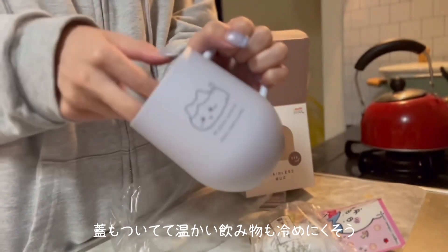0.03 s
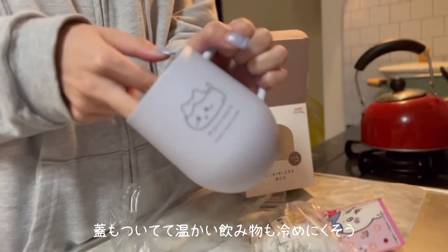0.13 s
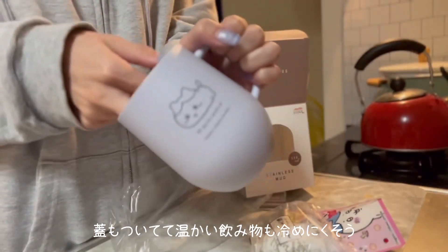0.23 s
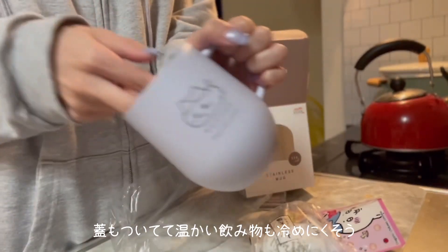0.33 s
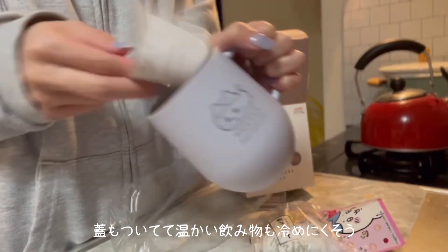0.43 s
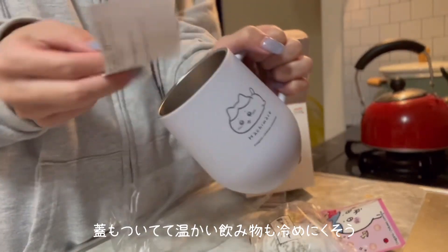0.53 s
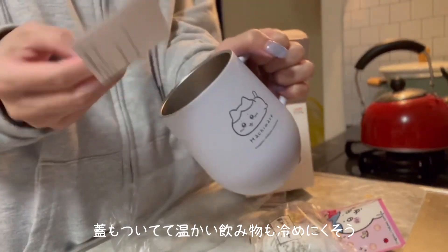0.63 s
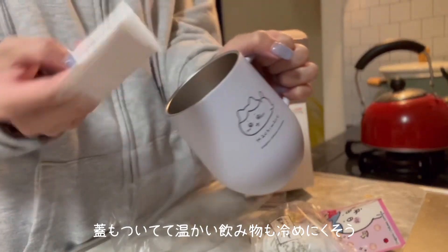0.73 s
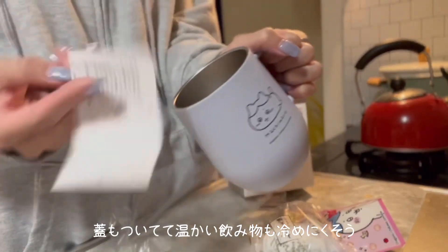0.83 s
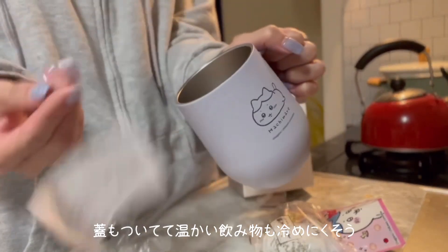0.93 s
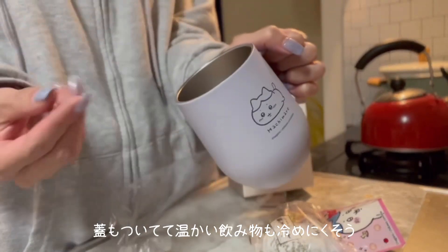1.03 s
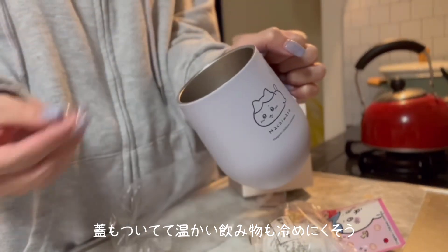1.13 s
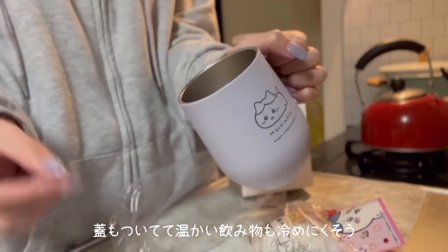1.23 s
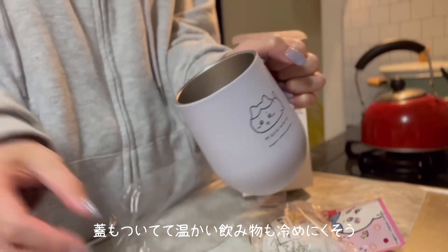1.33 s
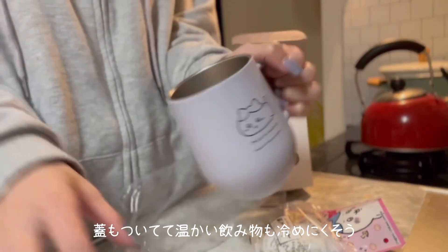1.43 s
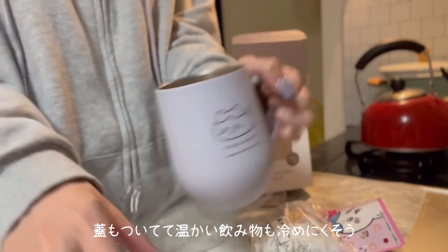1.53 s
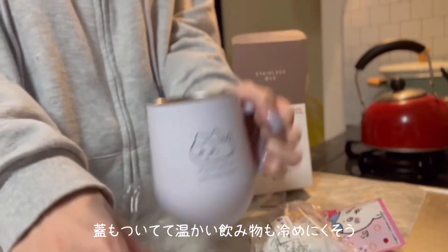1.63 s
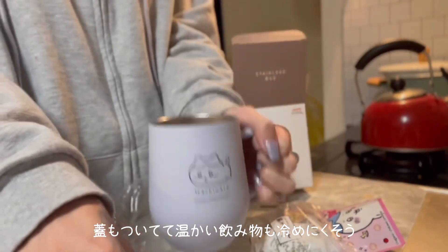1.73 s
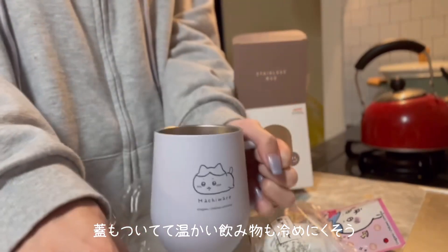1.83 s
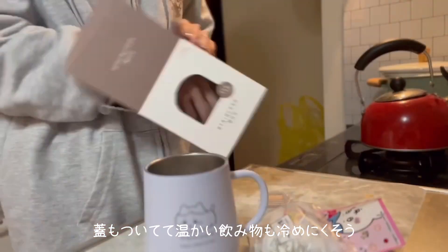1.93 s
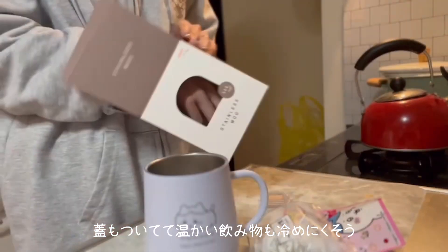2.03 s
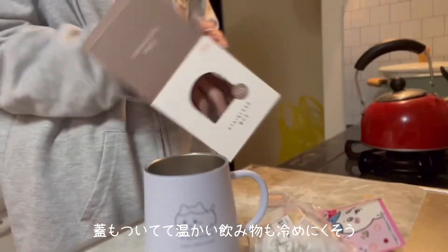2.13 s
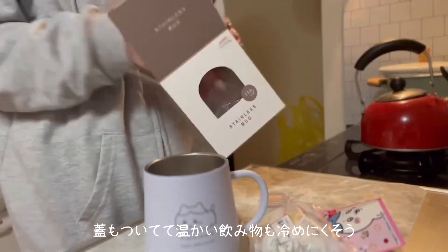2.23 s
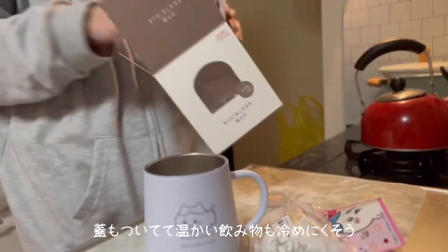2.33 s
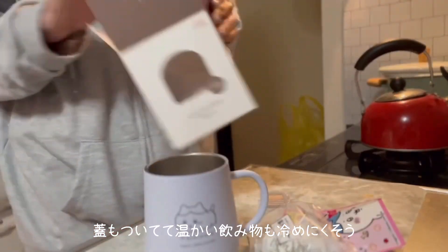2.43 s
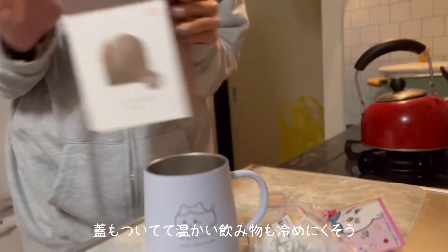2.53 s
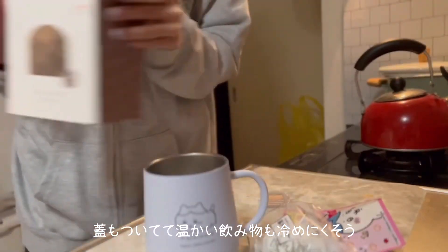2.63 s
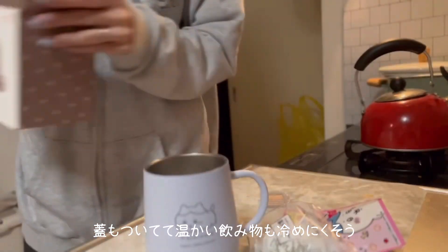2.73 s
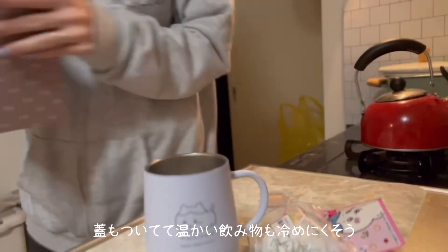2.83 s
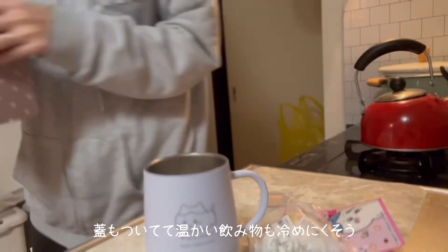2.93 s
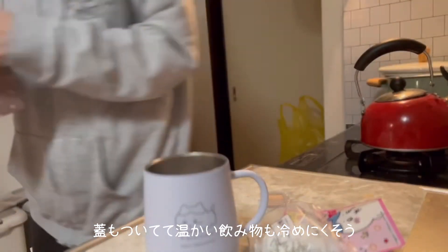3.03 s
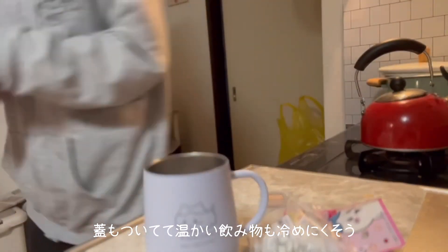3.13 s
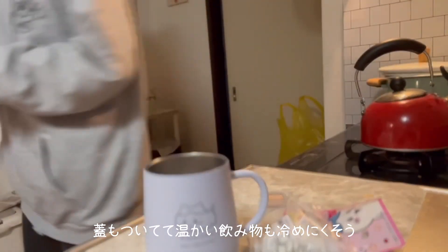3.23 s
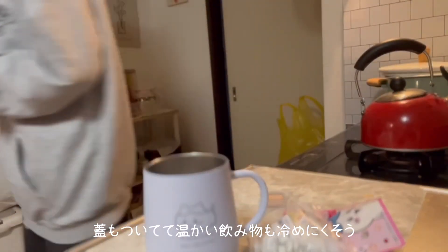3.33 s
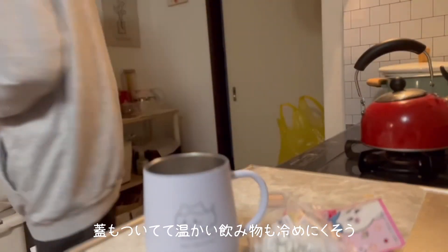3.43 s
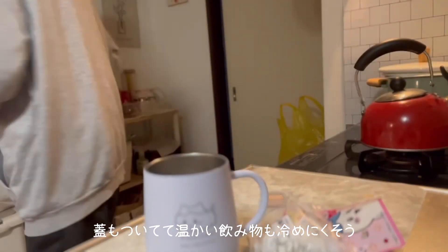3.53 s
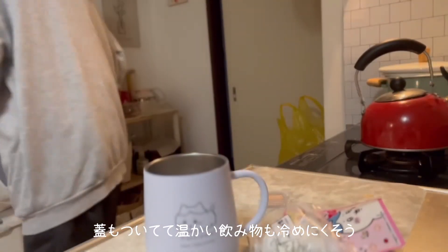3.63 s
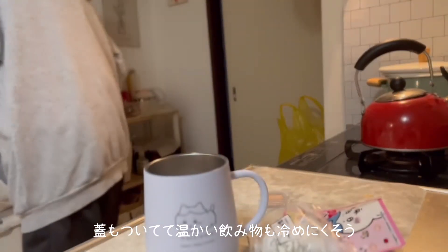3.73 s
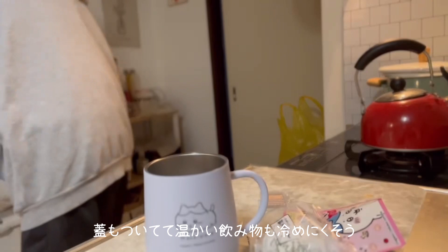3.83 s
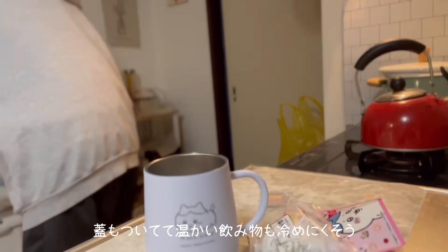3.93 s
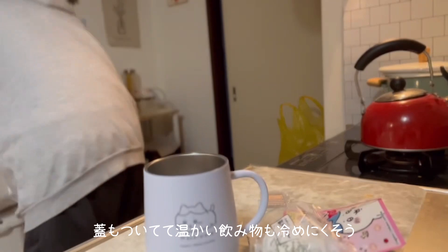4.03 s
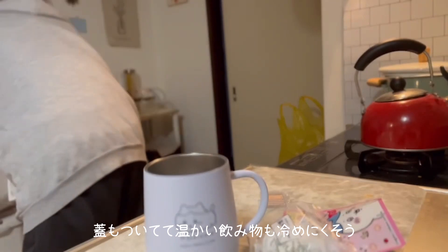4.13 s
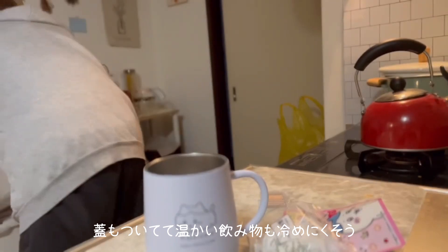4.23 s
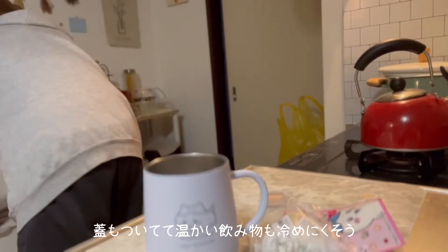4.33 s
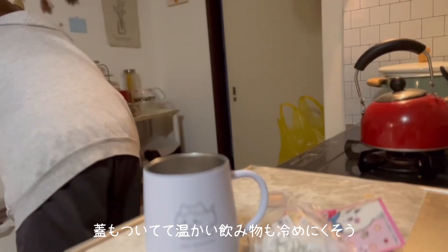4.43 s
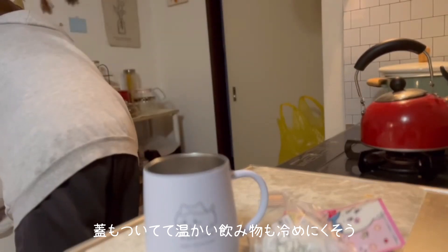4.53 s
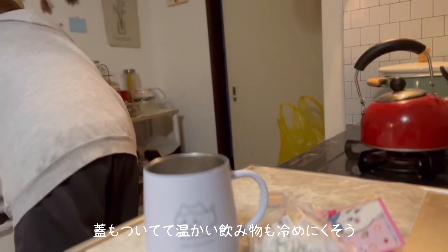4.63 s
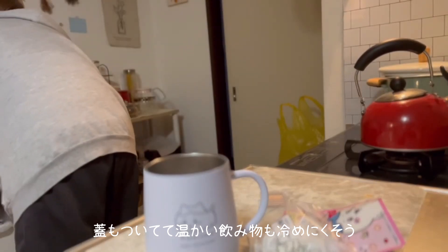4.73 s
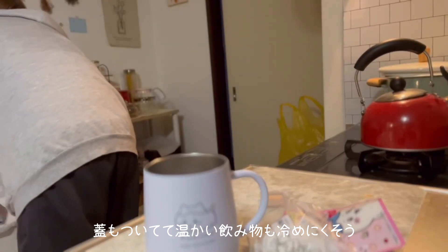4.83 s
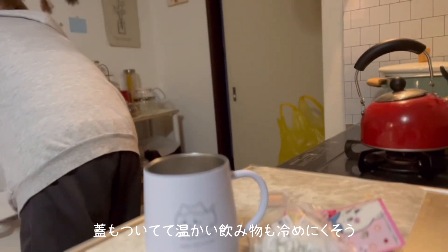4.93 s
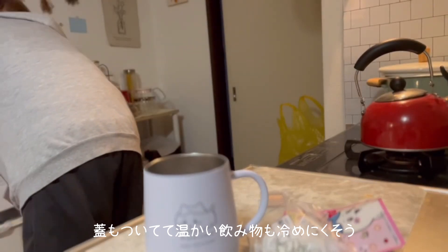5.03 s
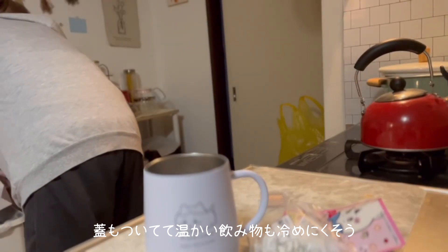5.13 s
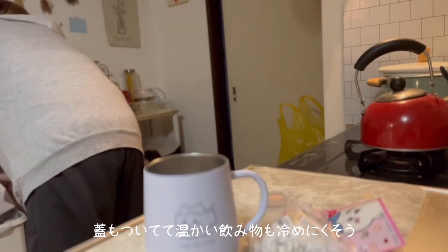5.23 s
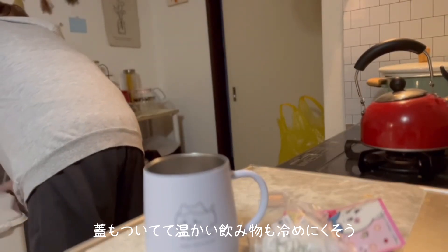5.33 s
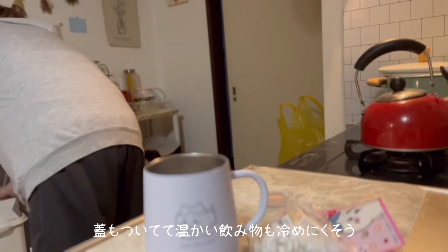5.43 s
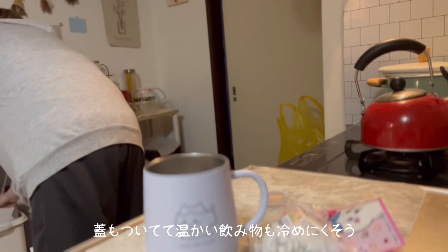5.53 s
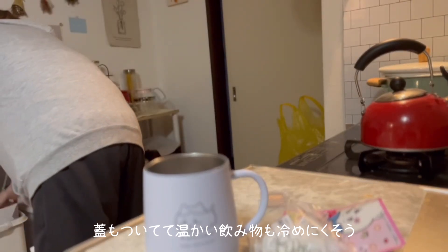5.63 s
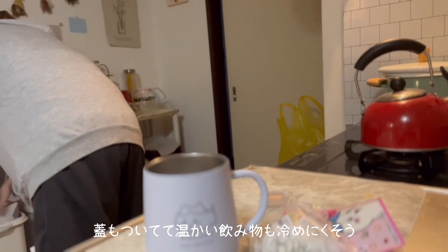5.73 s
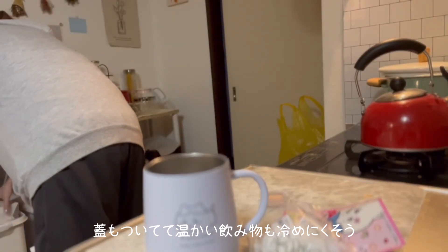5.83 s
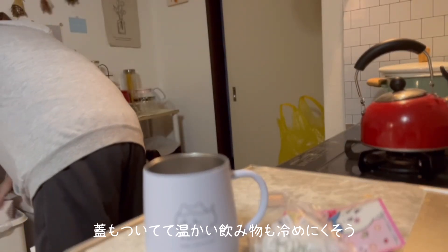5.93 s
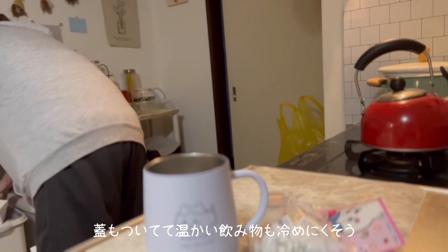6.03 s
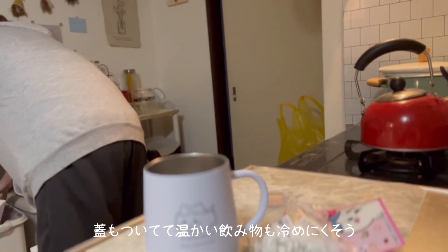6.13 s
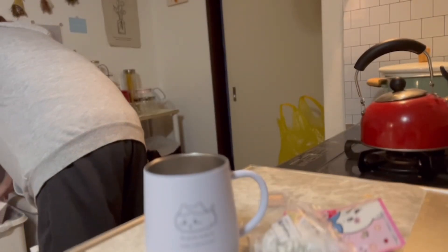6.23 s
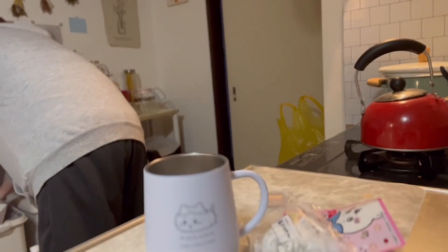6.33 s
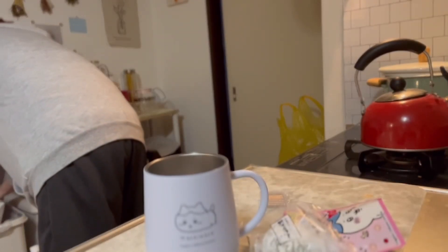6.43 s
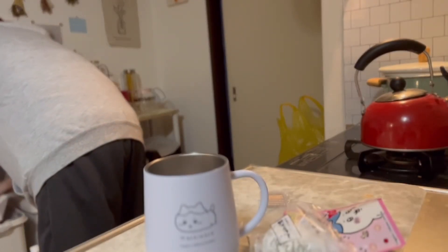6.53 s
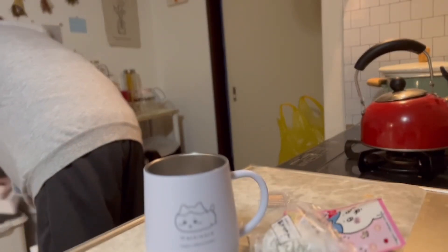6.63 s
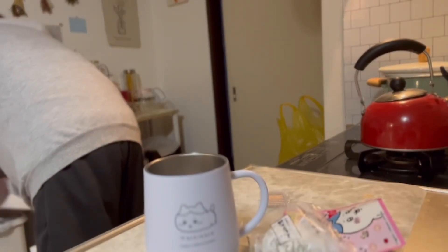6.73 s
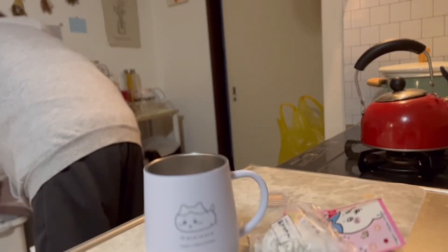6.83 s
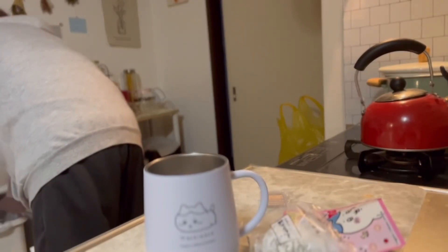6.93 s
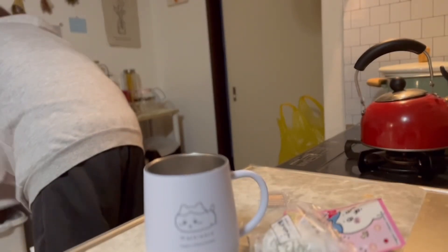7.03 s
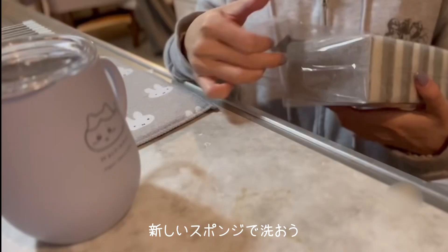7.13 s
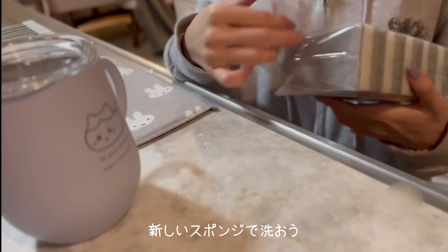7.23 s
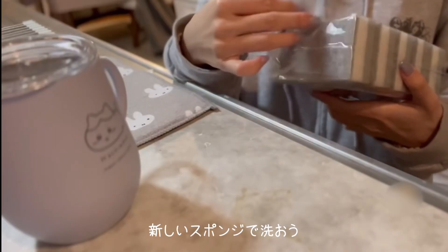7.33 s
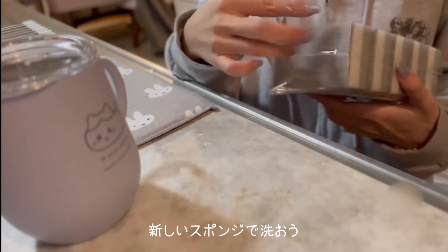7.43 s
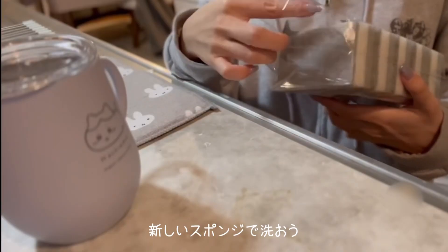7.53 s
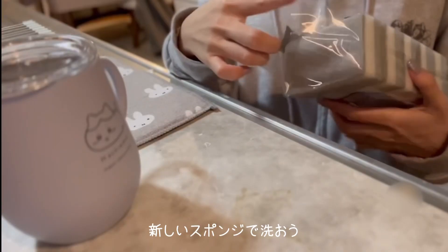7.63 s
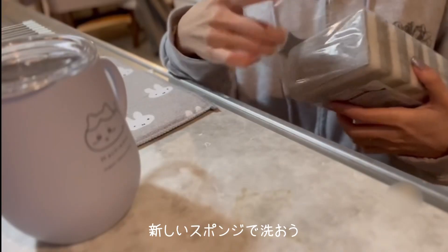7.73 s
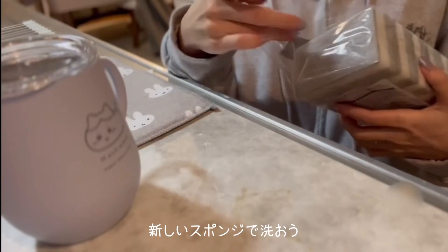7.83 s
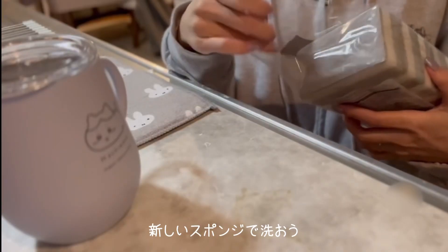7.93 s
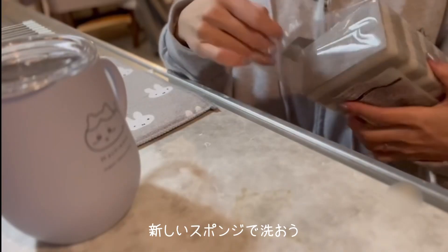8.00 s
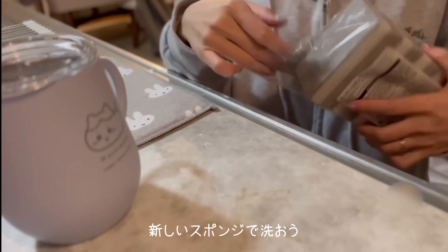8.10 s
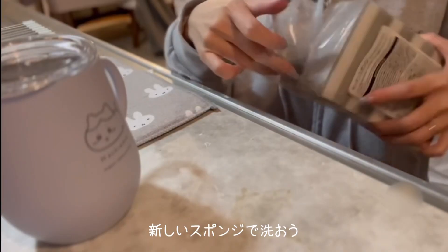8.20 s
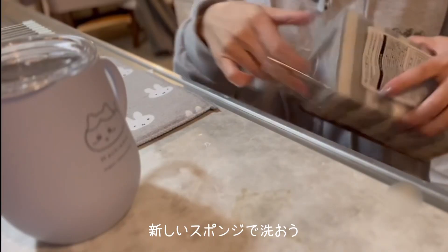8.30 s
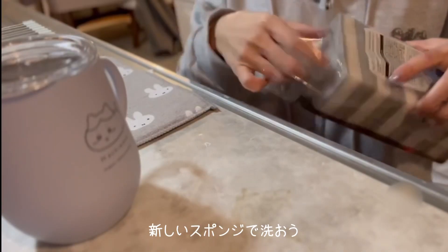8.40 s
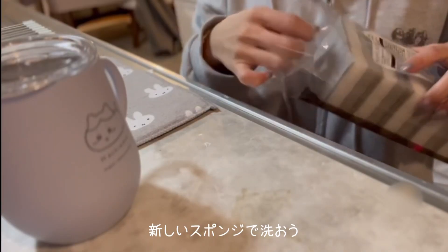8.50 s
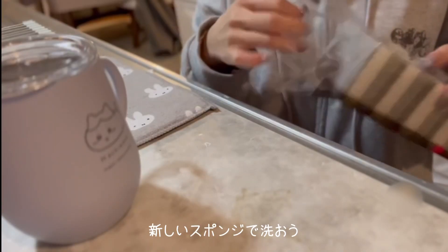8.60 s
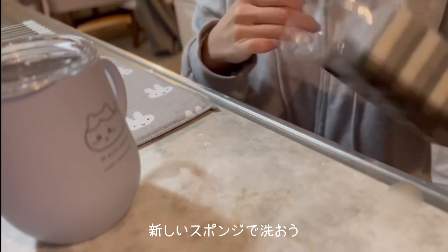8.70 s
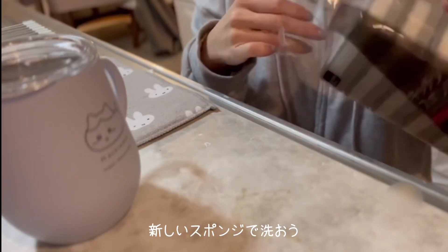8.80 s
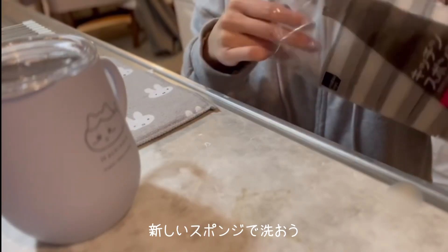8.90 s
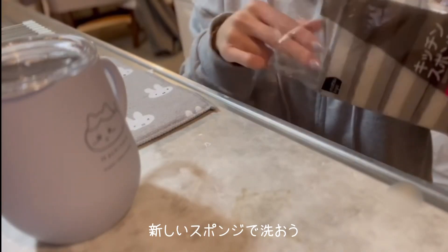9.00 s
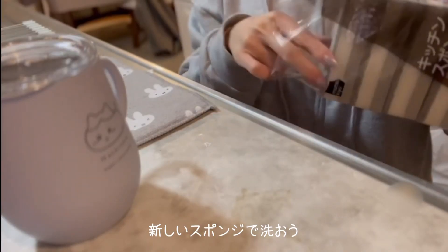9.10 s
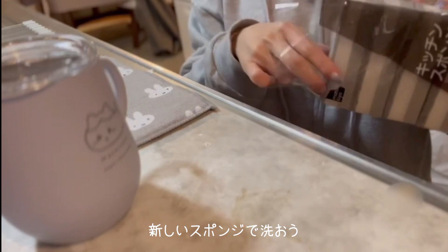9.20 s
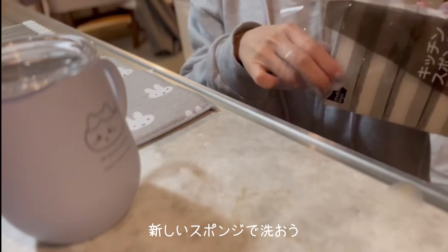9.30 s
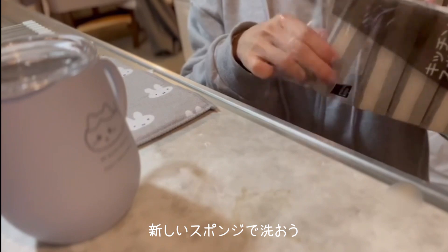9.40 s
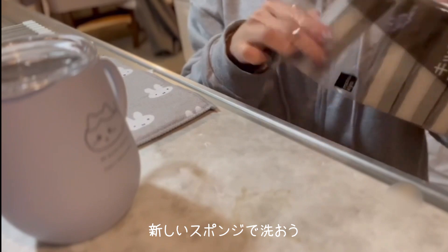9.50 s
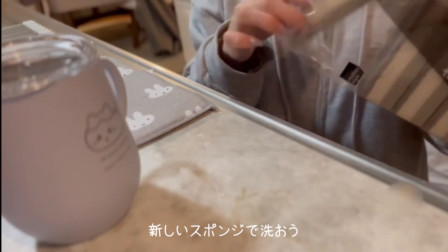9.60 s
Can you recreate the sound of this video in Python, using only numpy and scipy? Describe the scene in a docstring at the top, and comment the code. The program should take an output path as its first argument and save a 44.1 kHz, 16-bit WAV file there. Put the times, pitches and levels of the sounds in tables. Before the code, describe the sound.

In a small kitchen with a faint low hum, a cardboard insert squeaks and scrapes from a steel mug, then clacks sharply on the counter. The mug is set down with small clicks, a hollow box pops and rubs. Sweatshirt swishes, soft steps and muffled cupboard bumps follow at left. Finally a plastic sponge pack crinkles brightly, close to the stereo microphones.

```python
"""Cardboard squeaks and scrapes out of a singing steel mug by stick-slip, over a low hum, and clacks down.
Blows ring the modes of a kitchen counter and a hollow box; fingers brush cardboard as random friction.
A sweatshirt swishes, soft steps thud, and things scuff and bump in a low cupboard off to the left.
Then a plastic pack of sponges crinkles close by as its film buckles in many short, ringing creases.
Decaying noise gives the small kitchen's reflections; phase curves give two closely spaced microphones."""
import sys
import numpy as np
from scipy import signal
from scipy.fft import rfft, irfft, next_fast_len
from scipy.io import wavfile
from scipy.ndimage import uniform_filter1d

SR = 44100
rng = np.random.default_rng(int(sys.argv[2]) if len(sys.argv) > 2 else 0)


def output_pcm(signal):
    """Save a mono or channel-first signal as 16-bit PCM at the path in sys.argv[1].

    Samples are clipped to [-1, 1] before scaling.
    """
    pcm = np.clip(np.atleast_2d(signal).T, -1, 1) * 32767
    wavfile.write(sys.argv[1], SR, np.round(pcm).astype(np.int16))


N = 426006  # samples


def undb(db):
    """Decibel law: level to amplitude ratio."""
    return 10 ** (np.asarray(db) / 20)


def unit(x):
    """Normalisation to an RMS of one."""
    return x / np.sqrt(np.mean(x ** 2))


def seconds(count):
    """Sampling: the time of each sample."""
    return np.arange(count) / SR


def add(track, start_s, sound):
    """Superposition: mix a sound in at its start time."""
    i = int(start_s * SR)
    track[i:i + len(sound)] += sound[:N - i]


def peak(x, level_db):
    """Short-time level: scale so that the loudest millisecond has the given RMS."""
    power = uniform_filter1d(x ** 2, size=44)
    return x * undb(level_db) / np.sqrt(power.max())


def colour(x, points, size=4096):
    """Minimum-phase filtering: a causal filter through (pitch_hz, level_db) points."""
    hz, db = np.transpose(points)
    bin_hz = np.arange(size // 2 + 1) * SR / size
    gain = undb(np.interp(np.log(bin_hz + 1), np.log(hz), db))
    # folding the cepstrum onto positive times makes the response causal
    cepstrum = irfft(np.log(gain))[:size // 2]
    cepstrum[1:] *= 2
    response = irfft(np.exp(rfft(cepstrum, size)))
    return signal.oaconvolve(x, response)[:len(x)]


def resonate(x, hz, q):
    """Resonance: a second-order band-pass of quality factor q."""
    hz = min(hz, SR / 3)
    w = 2 * np.pi * hz / SR
    a = np.sin(w) / (2 * q)
    return signal.lfilter([a, 0, -a], [1 + a, -2 * np.cos(w), 1 - a], x)


def ring(modes, count=36000):
    """Modal superposition: decaying sines, alternating in sign, form an impulse response."""
    t = seconds(count)
    out = np.zeros(count)
    for k, (hz, db, t60_s) in enumerate(modes):
        out += (-1) ** k * undb(db - 60 * t / t60_s) * np.sin(2 * np.pi * hz * t)
    return out


def strike(modes, contact_ms):
    """Impact excitation: a softer contact pushes for longer and misses the high modes."""
    t = seconds(count=2000) * 1000 / contact_ms
    push = t * np.exp(-2 * np.pi * t)
    return signal.fftconvolve(ring(modes, count=18000), push)


def burst(decay_ms, count=12000):
    """Random micro-impacts: a cluster that builds up quickly and decays exponentially."""
    t = seconds(count) * 1000 / decay_ms
    return rng.standard_normal(count) * np.exp(-t) * (1 - np.exp(-10 * t))


def walk(rate_hz, count=N):
    """Slow modulation: straight lines between random knots, with a spread near 1."""
    k = int(SR / rate_hz)
    knots = 1.2 * rng.standard_normal(count // k + 2)
    return (knots[:-1, None] + np.diff(knots)[:, None] * np.arange(k) / k).ravel()[:count]


def friction(rate_hz, spread_db, flicker_db):
    """Dry friction: a random train of slips of uneven size that come in flurries."""
    flurry = walk(45)
    at = np.flatnonzero(rng.random(N) < rate_hz / SR)
    sign, size = rng.random((len(at), 2)).T
    size_db = spread_db * np.minimum(-np.log(1 - size), 4)
    slips = np.zeros(N)
    slips[at] = np.sign(sign - .5) * undb(size_db + flicker_db * flurry[at])
    return slips


def strokes(rows, attack_s, release_s, axis=2):
    """Addition of powers: each movement builds up, then dies away after its length; axis picks the level."""
    power = np.zeros(N)
    for row in rows:
        start_s, length_s = row[:2]
        t = seconds(count=int((length_s + 10 * release_s) * SR))
        shape = np.minimum(t / attack_s, 1) * np.exp(-np.maximum(t - length_s, 0) / release_s)
        add(power, start_s, (undb(row[axis]) * shape) ** 2)
    return np.sqrt(power)


def swell(count):
    """Half-sine envelope: the smooth rise and fall of one short movement."""
    return np.sin(np.pi * np.arange(count) / count)


def rise_and_fall(rise_ms, count):
    """Critically damped pulse: an envelope that peaks after its rise time and then fades."""
    t = seconds(count) * 1000 / rise_ms
    return t * np.exp(1 - t)


def shifting(x, depth_db=3.5, rate_hz=11):
    """Changing contact: as the touching surfaces change, each frequency band swells and sinks on its own."""
    out = 0
    for hz in 400 * 2 ** np.arange(5):
        low = signal.filtfilt(*signal.butter(2, hz, fs=SR), x)
        out = out + low * undb(depth_db * walk(rate_hz))
        x = x - low
    return unit(out + x * undb(depth_db * walk(rate_hz)))


def bumps(rows, q):
    """Damped collision: soft, ragged bursts, each filtered around its own pitch."""
    out = np.zeros(N)
    for start_s, level_db, hz, decay_ms in rows:
        bump = resonate(resonate(burst(decay_ms), hz, q), hz, q)
        add(out, start_s, peak(bump, level_db))
    return out


# kitchen background spectrum: pitch_hz, level_db
FLOOR = [(15, -38.5), (25, -6.5), (87, -1), (125, -7), (200, -9), (394, -19.5), (560, -29.5), (818, -26.5),
         (1200, -27), (1840, -34.5), (6560, -44), (7710, -48), (11000, -42), (14000, -35.5), (16000, -52)]
FLOOR_DB, HUM_HZ, HUM_DB = -59, 82.2, -64


def background(side_db=-5, side_hz=250):
    """Frequency modulation and shaped noise: a wavering appliance hum over room noise with shared bass."""
    mid, side = (unit(colour(rng.standard_normal(N), FLOOR)) for _ in range(2))
    treble = signal.lfilter(*signal.butter(1, side_hz, "high", fs=SR), side)
    side = undb(side_db) * (side / 2 + treble)
    hum_hz = HUM_HZ + 2.73 * walk(20)
    hum = np.sin(2 * np.pi * np.cumsum(hum_hz) / SR) * undb(1.4 * walk(3.9))
    return undb(FLOOR_DB) * (mid + np.array([side, -side])) + undb(HUM_DB) * unit(hum)


SQUEAK_GLIDE_PER_S = 0.63  # share by which the pitch rises as the grip tightens


def squeak(hz, count):
    """Stick-slip oscillation: a rough tone that catches and lets go, gliding with the grip."""
    glide = SQUEAK_GLIDE_PER_S * (seconds(count) - count / SR / 2)
    pitch = hz * (1 + glide + .012 * walk(60, count))
    roughness = 1 + .7 * walk(250, count)
    return np.sin(2 * np.pi * np.cumsum(pitch) / SR) * roughness * swell(count)


# two outer pulls and one between draw the cardboard over the rim: start_s, length_s, level_db (of slips)
PULLS = [(0, .032, -33.5), (.11, 0.097, -56.5), (.21, .18, -44)]
PULL_ATTACK_S, PULL_RELEASE_S = 0.093, 0.042
# spectrum of the slide: pitch_hz, level_db
SLIDE_COLOUR = [(150, -22), (450, -23), (680, -11), (1100, -6), (2200, 0.5), (3500, 4.5), (6000, 10.5),
                (8500, 6), (10500, 5), (13000, 7.5), (16000, 7)]
# modes of the steel mug: pitch_hz, level_db, t60_s
MUG_MODES = [(1495, 1, 0.8), (2260, -8, .4), (2695, -1, 0.35), (3219, -6, .2), (3967, 0, .45),
             (4856, -5, .2), (5017, -1, .45), (5120, -9, .6), (5222, 2, 0.6), (5280, -3, .45),
             (5900, -7, .4), (7601, -9, .6), (8300, -2, .25)]
# squeaks of cardboard on steel: start_s, length_s, pitch_hz, level_db
SQUEAKS = [(0.023, 0.15, 690, -53), (0.036, 0.071, 2670, -46), (.045, 0.069, 2153, -44),
           (0.053, 0.043, 3800, -42.5), (0.059, 0.031, 3380, -43), (0.103, 0.032, 2130, -53),
           (0.216, 0.039, 2190, -53.5), (0.218, 0.14, 686, -61.5), (0.284, 0.059, 2243, -51.5),
           (0.362, 0.03, 2190, -50), (.355, 0.037, 3800, -51), (0.359, 0.059, 5900, -44),
           (0.353, 0.11, 8210, -40.5), (.275, 0.083, 6580, -49), (.315, .04, 3900, -56),
           (.395, 0.028, 6730, -45)]


def sliding(slide_db=-2.5, steel_db=-13):
    """Friction-driven resonance: cardboard slips over the rim, keeps the steel singing and squeaks."""
    speed = strokes(PULLS, PULL_ATTACK_S, PULL_RELEASE_S)
    slips = unit(friction(rate_hz=2200, spread_db=2.0, flicker_db=3.5)) * speed
    steel = ring(MUG_MODES)
    singing = signal.oaconvolve(slips, steel / np.linalg.norm(steel))[:N]
    out = undb(slide_db) * colour(slips, SLIDE_COLOUR) + undb(steel_db) * singing
    for start_s, length_s, hz, level_db in SQUEAKS:
        add(out, start_s, undb(level_db) * squeak(hz, count=int(length_s * SR)))
    return out


# the insert catches the rim; where it does decides which modes sing most: start_s, level_db, pitch_hz
RIM_CATCHES = [(.005, -52, 1550), (.072, -43, 2900), (.118, -48, 3700), (.262, -53, 1500),
               (.315, -50, 2260), (.377, -48, 5500), (.428, -39.5, 5400)]


def mug():
    """Modal excitation: each catch on the rim sets the steel ringing, favouring nearby modes."""
    out, steel = np.zeros(N), ring(MUG_MODES)
    for start_s, level_db, hz in RIM_CATCHES:
        add(out, start_s, peak(resonate(steel, hz, 1.9), level_db))
    return out


# hard edges and fingernails: start_s, level_db, decay_ms
TICKS = [(0.077, -39, 3), (.118, -41, 5.8), (0.238, -43, 1.8), (0.378, -38, 6.2), (0.425, -35, 16),
         (.617, -54, 6.7), (1.0042, -12, 2.2), (1.0752, -32, 1), (1.093, -37, 3.8), (1.2008, -31.5, 4.4),
         (1.6653, -48.5, 11.3), (1.8382, -35, 3.7), (1.8605, -23.5, 3), (1.8868, -25.5, 7.5),
         (2.0914, -34, 5.7), (2.12, -51, 2.7), (2.148, -36, 1.7), (4.3307, -41.5, 4.5), (4.634, -43, 6.6),
         (5.346, -32.5, 5.6), (5.8254, -54, 2.9), (6.259, -51, 2.3), (6.423, -45.5, 8.7)]
# spectrum of a tick: pitch_hz, level_db
TICK_COLOUR = [(150, -7), (700, -11), (1800, -6.5), (3200, 0.5), (4800, -5), (6400, 3.5), (8000, 3.5),
               (11000, 3), (13500, 1.5), (16000, 1)]
# modes of the insert's hard edge as it lands: pitch_hz, level_db, t60_s
INSERT_MODES = [(1640, -12.5, .03), (2580, -11, .035), (3180, -7.5, 0.079), (5560, -5.5, .018),
                (6510, 4, .02), (7850, 4, .018)]
LANDING_S, LANDING_DB = 1.0048, -19


def ticks():
    """Impulsive contact: hard edges and fingernails tick; the insert lands with a ringing clack."""
    out = np.zeros(N)
    add(out, LANDING_S, peak(ring(INSERT_MODES), LANDING_DB))
    for start_s, level_db, decay_ms in TICKS:
        add(out, start_s, peak(colour(burst(decay_ms), TICK_COLOUR), level_db))
    return out


# modes of the counter top: pitch_hz, level_db, t60_s
COUNTER_MODES = [(63.5, -2.5, 0.68), (87, -12, 0.61), (122, -11, .2), (163, -1.5, 0.32), (218, -6, 0.12),
                 (285, -8, 0.095), (351, -1.5, .13), (465.5, -2, 0.08), (602, -1.5, 0.053), (805, 1, 0.036),
                 (1650, -13, .07), (2540, -14.5, 0.089)]
# blows on the counter: start_s, level_db, contact_ms, crack_db (relative to the blow)
COUNTER_BLOWS = [(1.0158, -25, 0.36, -11), (1.025, -23.5, 1.2, -18.5), (1.094, -35.5, 5.1, -10),
                 (1.862, -38, 0.64, -8), (1.888, -39.5, 1.8, 1)]
# modes of the hollow cardboard box: pitch_hz, level_db, t60_s
BOX_MODES = [(212, -13, 0.027), (534, -9, 0.052), (610, -3, 0.021), (730, 0, 0.014), (844, -9.5, 0.037),
             (972, -11.5, 0.029), (1500, -9, 0.031), (1820, -3, 0.0094)]
# knocks on cardboard: start_s, level_db, contact_ms, crack_db (relative to the knock)
BOX_KNOCKS = [(0.44, -51.5, 0.15, 13.5), (0.7431, -50, 0.22, 14), (2.0653, -18.5, 1, -19.5),
              (2.0805, -31, 0.94, -8.5), (2.4726, -39.5, 0.18, 3.5), (2.4934, -32.5, 0.078, 10),
              (2.5332, -36, 0.17, 2)]
# spectrum of the papery crack: pitch_hz, level_db
CRACK_COLOUR = [(100, 0), (300, 1), (1800, -4), (3300, -4.5), (6000, -5.5), (9000, -14), (16000, -31)]


def knocks():
    """Struck modes: the counter thuds; the box gives a hollow pop with a papery crack."""
    out = np.zeros(N)
    for start_s, level_db, contact_ms, crack_db in COUNTER_BLOWS:
        add(out, start_s, peak(strike(COUNTER_MODES, contact_ms), level_db))
        crack = resonate(burst(decay_ms=10.0), 1100, 0.71)
        add(out, start_s, peak(crack, level_db + crack_db))
    for start_s, level_db, contact_ms, crack_db in BOX_KNOCKS:
        add(out, start_s, peak(strike(BOX_MODES, contact_ms), level_db))
        crack = colour(burst(decay_ms=3.56), CRACK_COLOUR)
        add(out, start_s, peak(crack, level_db + crack_db))
    return out


# fingers brush over cardboard: start_s, length_s, level_db (before brush_db)
BRUSHES = [(.45, 0.41, -66.5), (1.1, 0.1, -57), (1.65, 0.52, -63.5), (1.92, 0.033, -43), (2.07, 0.075, -49),
           (2.16, 0.09, -56)]
BRUSH_ATTACK_S, BRUSH_RELEASE_S = 0.022, 0.035
# spectrum of brushing fingers and of swishing cloth: pitch_hz, level_db
SWISH_COLOUR = [(300, 4), (650, 7), (1100, -0.5), (1800, 4.5), (3000, 1), (6000, 1), (8500, 4),
                (10500, -11.5), (12800, 3), (16000, -5)]


def brushing(brush_db=1):
    """Random friction: fingertips slip over cardboard."""
    speed = strokes(BRUSHES, BRUSH_ATTACK_S, BRUSH_RELEASE_S)
    slips = friction(rate_hz=6000, spread_db=8.5, flicker_db=0.0)
    return unit(colour(slips, SWISH_COLOUR)) * speed * undb(brush_db)


# the box rubs along a sleeve: start_s, length_s, level_db (before the swell), pitch_hz
RUBS = [(2.699, 0.15, -63.5, 2010), (2.817, 0.17, -63, 1970), (2.897, .1, -66, 4130),
        (2.997, 0.17, -83, 1800)]


def rubbing():
    """Band-limited friction: cloth on cardboard rasps narrowly, its pitch differing from stroke to stroke."""
    out = np.zeros(N)
    for start_s, length_s, level_db, hz in RUBS:
        count = int(length_s * SR)
        slips = rng.standard_normal(count) * undb(3 * walk(60, count))
        rasp = unit(resonate(resonate(slips, hz, 2.4), hz, 2.5))
        add(out, start_s, undb(level_db) * rasp * swell(count))
    return out


# each movement of the body swishes the sweatshirt: start_s, length_s, level_db
SWISHES = [(2.71, 0.11, -60), (2.88, 0.13, -55.5), (3.05, 0.15, -65), (3.26, 0.17, -69.5), (3.47, 0.1, -61),
           (3.61, 0.12, -71), (4.24, 0.14, -60), (4.46, 0.14, -60.5), (4.625, 0.01, -45.5),
           (4.7, 0.37, -65), (5.18, 0.11, -58.5), (5.25, 0.11, -52), (5.335, 0.036, -44),
           (5.47, 0.065, -49), (5.66, 0.15, -63), (5.81, 0.17, -55.5), (6.0, 0.056, -51),
           (6.15, 0.11, -64.5), (6.31, 0.056, -54.5), (6.42, 0.071, -57), (6.76, 0.4, -59)]
SWISH_ATTACK_S, SWISH_RELEASE_S = 0.013, 0.044


def sweatshirt():
    """Dense friction: fine slips of cloth on cloth."""
    speed = strokes(SWISHES, SWISH_ATTACK_S, SWISH_RELEASE_S)
    slips = friction(rate_hz=9000, spread_db=6.5, flicker_db=1.5)
    return shifting(colour(slips, SWISH_COLOUR)) * speed


# cardboard and packets are dragged along a shelf: start_s, length_s, level_db
DRAGS = [(2.825, 0.032, -57.5), (2.87, 0.1, -61.5), (3.02, 0.063, -59.5), (3.095, 0.02, -58.5),
         (3.15, 0.19, -70), (6.725, 0.2, -55), (6.91, 0.14, -50.5), (7.03, 0.092, -48.5)]
DRAG_ATTACK_S, DRAG_RELEASE_S = 0.011, 0.0046
# spectrum of dragging: pitch_hz, level_db
DRAG_COLOUR = [(200, 6.5), (540, 2), (660, 11.5), (800, 0), (1000, -4), (1700, 4), (2300, -4.5),
               (3200, -8.5), (7000, -15), (15000, -38)]


def dragging():
    """Frictional chatter: a flat surface slips over a shelf."""
    speed = strokes(DRAGS, DRAG_ATTACK_S, DRAG_RELEASE_S)
    slips = friction(rate_hz=3600, spread_db=1.0, flicker_db=1.5)
    return shifting(colour(slips, DRAG_COLOUR)) * speed


# soft steps on the floor: start_s, level_db, pitch_hz, rise_ms
STEPS = [(3.1, -52, 92, 29), (3.236, -48, 79.7, 31), (3.315, -53, 84, 23), (4.394, -41.5, 113, 15)]


def steps():
    """Damped low oscillation: the floor gives a soft thud under each step."""
    out, t = np.zeros(N), seconds(count=12000)
    for start_s, level_db, hz, rise_ms in STEPS:
        thud = np.sin(2 * np.pi * hz * t) * rise_and_fall(rise_ms, count=len(t))
        add(out, start_s, undb(level_db) * thud)
    return out


# things are pushed about in the cupboard: start_s, length_s, level_db (before scuff_db)
SCUFFS = [(4.0, 0.42, -65), (4.48, 0.29, -55), (4.69, 0.11, -57.5), (4.8, 0.18, -65), (5.34, 0.064, -38),
          (5.49, 0.09, -50), (5.64, 0.078, -64.5), (5.89, 0.24, -65.5), (6.33, 0.21, -63),
          (6.55, 0.22, -66), (6.75, .29, -61.5), (7.068, .05, -43.5)]
SCUFF_ATTACK_S, SCUFF_RELEASE_S = 0.014, 0.016
# spectrum of scuffing: pitch_hz, level_db
SCUFF_COLOUR = [(60, 2), (125, 1.5), (185, 14), (260, 4.5), (370, 8.5), (480, -1), (650, -4), (1000, -5),
                (1800, -11), (3500, -39), (9000, -48)]
# things shifted in the cupboard: start_s, level_db, pitch_hz, decay_ms
CUPBOARD_BUMPS = [(3.567, -61.5, 678, 8.2), (3.9944, -52.5, 609, 13), (4.205, -54, 300, 8.6),
                  (4.2668, -41.5, 236, 9.3), (4.329, -59, 206, 9.7), (4.395, -40, 199, 19),
                  (4.522, -54, 1500, 8.1), (4.538, -48.5, 600, 9.2), (4.603, -45, 393, 5.2),
                  (4.637, -38.5, 1340, 15), (4.695, -38.5, 238, 21), (4.948, -59, 363, 6.9),
                  (5.204, -57, 293, 7.6), (5.258, -54, 605, 12), (5.337, -39, 1400, 5),
                  (5.34, -41, 380, 18), (5.3563, -35, 895, 11), (5.36, -42.5, 187, 29),
                  (5.381, -40.5, 800, 7.1), (5.501, -49, 686, 7.1), (5.525, -41.5, 516, 7.7),
                  (5.657, -51.5, 513, 5.6), (6.331, -54, 607, 6.9), (6.378, -59, 950, 7),
                  (6.448, -54, 229, 8.8), (6.877, -52, 630, 14), (7.0425, -37, 360, 8.7),
                  (7.09, -39, 300, 12)]


def rummaging(scuff_db=-2):
    """Friction and collision: things scuff and bump in the cupboard."""
    push = strokes(SCUFFS, SCUFF_ATTACK_S, SCUFF_RELEASE_S)
    slips = friction(rate_hz=2400, spread_db=1.0, flicker_db=4.0)
    scuff = shifting(colour(slips, SCUFF_COLOUR)) * push
    return undb(scuff_db) * scuff + bumps(CUPBOARD_BUMPS, q=0.92)


def grains(rate_hz, spread_db, centre_hz, octaves, cycles, count=160):
    """Random buckling: creases flip and ring for a few cycles, neighbours in time alike in pitch and size."""
    at = np.flatnonzero(rng.random(N - count) < rate_hz / SR)
    chance = rng.random((len(at), 3))
    offset_octaves = octaves * (2 * chance[:, 0] - 1) + 0.36 * walk(70)[at]
    hz = np.clip(centre_hz * 2 ** offset_octaves, 300, .42 * SR)
    size = undb(spread_db * np.minimum(-np.log(1 - chance[:, 1]), 4) + 2 * walk(90)[at])
    turns = hz[:, None] * seconds(count)
    decay = np.exp(-turns / (cycles * (.5 + chance[:, 2:])))
    waves = size[:, None] * np.sin(2 * np.pi * turns) * decay
    # sum overlapping grains sample by sample
    return np.bincount((at[:, None] + np.arange(count)).ravel(), waves.ravel(), N)


# hands squeeze and turn the pack: start_s, length_s, crinkle_db, body_db (before hand and body gains)
SQUEEZES = [(7.14, 0.11, -51.5, -63), (7.228, 0.13, -41.5, -47), (7.435, 0.073, -41.5, -48.5),
            (7.567, 0.024, -40, -44.5), (7.62, 0.04, -35.5, -46.5), (7.737, 0.21, -47.5, -54.5),
            (7.932, 0.069, -40.5, -46), (8.1, .13, -48.5, -48.5), (8.271, 0.16, -52, -52.5),
            (8.42, 0.024, -39.5, -43.5), (8.536, .19, -47, -49), (8.755, 0.091, -46, -45),
            (8.922, .035, -45, -48), (8.968, .12, -41, -43), (9.129, 0.11, -43, -46),
            (9.284, 0.19, -38, -41), (9.474, 0.099, -38.5, -42.5), (9.62, .04, -39, -43.5)]
SQUEEZE_ATTACK_S, SQUEEZE_RELEASE_S = 0.0073, 0.045
# spectrum of the thin film: pitch_hz, level_db
FILM_COLOUR = [(200, -20.5), (700, -2), (1500, -2), (2800, 4), (4500, 6), (6600, 7), (8600, 10), (10600, 6),
               (12700, 11), (15500, -1)]
# spectrum of the pack's dull body: pitch_hz, level_db
PACK_COLOUR = [(30, -19), (70, 3), (130, -4.5), (210, 0), (380, -3.5), (600, -0.5), (1000, -2.5),
               (1500, -4), (3000, -14), (8000, -20.5)]


def crinkle(body_db=-3.5):
    """Buckling radiation: thin film crackles, and the sponges inside add a dull body."""
    creases = grains(rate_hz=550, spread_db=4.8, centre_hz=5600, octaves=1.9, cycles=1.5)
    # a small patch of film radiates the change of its motion
    radiated = np.diff(creases, prepend=0) + creases / 2
    film_gain = strokes(SQUEEZES, SQUEEZE_ATTACK_S, SQUEEZE_RELEASE_S, axis=2)
    film = unit(colour(radiated, FILM_COLOUR)) * film_gain
    slips = friction(rate_hz=1200, spread_db=5.0, flicker_db=1.95)
    body_gain = strokes(SQUEEZES, SQUEEZE_ATTACK_S, SQUEEZE_RELEASE_S, axis=3)
    body = shifting(colour(slips, PACK_COLOUR), depth_db=2.0) * body_gain
    return film + undb(body_db) * body


# the loudest buckles of the film: peak_s, level_db (before crack and flurry gains), pitch_hz, rise_ms
SNAPS = [(7.1757, -19, 12900, 0.48), (7.2196, -22.5, 13600, 0.58), (7.2338, -22, 6900, 0.6),
         (7.3266, -19, 6760, 0.55), (7.4316, -23, 6660, 0.8), (7.49, -29, 3630, 0.6),
         (7.514, -16, 4350, 0.53), (7.5682, -18, 5810, 0.55), (7.6207, -18, 5000, 0.55),
         (7.8805, -27, 6730, 0.51), (7.9287, -17, 6500, 0.59), (7.968, -18.5, 2970, 0.54),
         (7.9991, -18, 8070, 0.47), (8.0515, -17, 7100, 0.62), (8.165, -25.5, 7000, 0.68),
         (8.19, -26, 6590, 0.51), (8.236, -21.5, 6840, 0.59), (8.619, -23, 3400, 0.58),
         (8.658, -24.5, 6700, 0.47), (8.7053, -21.5, 6600, 0.62), (8.7761, -23, 6920, 0.55),
         (8.816, -34, 4580, 0.51), (8.8302, -22.5, 6720, 0.55), (8.9364, -23, 6800, 0.58),
         (8.9675, -16.5, 6000, 0.66), (9.0259, -21, 4940, 0.57), (9.0607, -16, 6490, 0.5),
         (9.0778, -14, 6480, 0.63), (9.208, -26.5, 2160, 0.56), (9.288, -17, 14100, 0.47),
         (9.3917, -20.5, 12900, 0.61), (9.479, -19.5, 2360, 0.57), (9.4933, -19, 6350, 0.55),
         (9.5556, -21.5, 6290, 0.6), (9.5706, -18.5, 4280, 0.66), (9.6078, -15, 6870, 0.54)]


def snaps(crack_db=-2, film_db=5.0, flurry_db=-16, flurry_ms=3.7):
    """Snap-through buckling: one sharp crack, then a brief flurry of small creases."""
    out = np.zeros(N)
    for peak_s, level_db, hz, rise_ms in SNAPS:
        flips = rng.standard_normal(900) * rise_and_fall(rise_ms, count=900)
        film = unit(colour(flips, FILM_COLOUR, size=512))
        crack = unit(resonate(flips, hz, 2.0)) + undb(film_db) * film
        add(out, peak_s - rise_ms / 1000, peak(crack, level_db + crack_db))
        flurry = resonate(burst(flurry_ms, count=3000), hz, 0.21)
        add(out, peak_s, peak(flurry, level_db + flurry_db))
    return out


# the pack bumps in the hand: start_s, level_db, pitch_hz, decay_ms
PACK_BUMPS = [(7.4904, -26, 763, 2), (7.5, -38, 71, 34), (7.578, -33, 65, 30), (7.576, -31, 259, 4.6),
              (7.622, -30.5, 332, 11.7), (8.968, -29.5, 740, 7.3), (9.08, -32, 1240, 4.8),
              (9.49, -30, 1150, 6.5), (9.622, -27, 1190, 6.2)]


def pack_bumps():
    """Damped collision: the pack bumps softly in the hand."""
    return bumps(PACK_BUMPS, q=0.79)


ROOM_T60_S, ROOM_TREBLE_T60_S = 0.19, 0.071


def kitchen(count=9000, early_db=5, early_s=0.005):
    """Reverberant decay: near surfaces come first, then a tail whose treble dies sooner."""
    t = seconds(count)
    noises = rng.standard_normal((2, count))
    # long waves reach both microphones alike
    noises[1] += signal.filtfilt(*signal.butter(2, 190, fs=SR), noises[0] - noises[1])
    sides = []
    for noise in noises:
        low = signal.lfilter(*signal.butter(1, 2500, fs=SR), noise)
        treble = noise - low
        tail = low * undb(-60 * t / ROOM_T60_S) + treble * undb(-60 * t / ROOM_TREBLE_T60_S)
        tail *= (1 + undb(early_db) * np.exp(-t / early_s)) * (t > .0015)
        sides.append(tail / np.linalg.norm(tail))
    return np.array(sides)


# colour of the reflections: pitch_hz, level_db
ROOM_COLOUR = [(40, -10), (150, -4), (300, 0), (480, -1), (660, 3), (1000, 0), (3000, 0), (8000, -1),
               (16000, -2)]


def reflections(send, size=3000):
    """Time-varying convolution: as hands and body keep moving, the pattern of reflections keeps changing."""
    send = np.pad(send, ((0, 0), (size, SR)))
    out = np.zeros_like(send)
    for i in range(0, N + size, size):
        # half-overlapping windows, each with a fresh room response
        echo = signal.fftconvolve(send[:, i:i + 2 * size] * swell(2 * size), kitchen(), axes=1)
        out[:, i:i + echo.shape[1]] += echo
    return np.array([colour(side, ROOM_COLOUR) for side in out[:, size:size + N]])


# what two microphones share of diffuse sound; they move in opposition around 11 kHz: pitch_hz, level_db
SHARED_COLOUR = [(100, 0), (7000, 0), (8700, -4), (9800, -26), (11800, -26), (13000, -5), (15000, 0)]


def diffuse(x):
    """Spatial coherence: sound from all around, as the pair of microphones hears it."""
    mid, side = colour((x[0] + x[1]) / 2, SHARED_COLOUR), (x[0] - x[1]) / 2
    return np.array([mid + side, mid - side])


# phase by which the left microphone leads, for sounds in front: pitch_hz, phase_rad
FRONT_PHASE = [(100, 0), (500, -0.2), (1400, -0.7), (3500, -.7), (5000, -2.6), (6200, -4), (7600, -4.2),
               (10000, -3.2), (11500, -3.1), (13500, -2.4), (15500, -1.2)]
# the same for sounds off to the left: pitch_hz, phase_rad
LEFT_PHASE = [(100, -0.2), (700, 1.25), (1600, 2), (2800, 3.5), (6000, 8.3), (8000, 8.6), (10000, 9.4),
              (12000, 9.45), (13800, 10), (15500, 12)]
# the same for sounds close by: pitch_hz, phase_rad
CLOSE_PHASE = [(100, 0), (1300, -1.1), (2500, -2.4), (4000, -3.8), (6600, -4.9), (9500, -3.45), (11500, -3),
               (13500, -2.4), (15500, -1.5)]


def place(x, wet_db, pan_db, phases=FRONT_PHASE):
    """Interaural-style cues: phase lead and level (left over right) give the direct sound and room send."""
    pan = undb(np.array([[pan_db], [-pan_db]]) / 2)
    size = next_fast_len(N + SR)
    bin_hz = np.arange(size // 2 + 1) * SR / size
    lead = np.interp(bin_hz, *np.transpose(phases))
    right = irfft(rfft(x, size) * np.exp(-1j * lead), size)[:N]
    return np.array([pan * [x, right], pan * x * undb(wet_db)])


# the hand that holds the pack stirs it less than the one that works it
HOLDING_HAND_DB, WORKING_HAND_DB = 0.5, 3.5


def scene():
    """Direct-to-reverberant balance: close sounds arrive drier than those of the cupboard on the left."""
    handling = brushing() + dragging() + rubbing() + steps()
    working_hand = undb(WORKING_HAND_DB) * crinkle() + pack_bumps()
    holding_hand = undb(HOLDING_HAND_DB) * crinkle()
    direct, send = (place(sliding(), wet_db=-3.0, pan_db=-0.5)
                    + place(mug(), wet_db=-6.0, pan_db=-4)
                    + place(ticks(), wet_db=-5.5, pan_db=1.0)
                    + place(knocks(), wet_db=-3.0, pan_db=-2.5)
                    + place(handling, wet_db=0.5, pan_db=-1.0)
                    + place(rummaging() + sweatshirt(), wet_db=1.0, pan_db=-1.0, phases=LEFT_PHASE)
                    + place(working_hand, wet_db=-4, pan_db=-2.0, phases=CLOSE_PHASE)
                    + place(snaps(), wet_db=-6.5, pan_db=3.1, phases=CLOSE_PHASE)
                    + place(holding_hand, wet_db=-2, pan_db=-2.5, phases=LEFT_PHASE))
    return direct + diffuse(reflections(send) + background())


TOP_HZ = 15600  # the sound ends steeply above this


def record(dry, lean=0.24, lean_hz=300):
    """Mid-side filtering: the low middle range widens and leans right; a low-pass cuts the top."""
    mid, side = (dry[0] + dry[1]) / 2, (dry[0] - dry[1]) / 2
    side = side + .4 * resonate(side, 300, .8)
    pair = np.array([mid + side, mid - side])
    pair = pair + lean * np.array([[-1], [1]]) * resonate(pair, lean_hz, 0.58)
    low_pass = signal.ellip(10, .2, 80, TOP_HZ, fs=SR, output="sos")
    return signal.sosfilt(low_pass, pair)


dry = scene()
out = record(dry)
output_pcm(out)
```